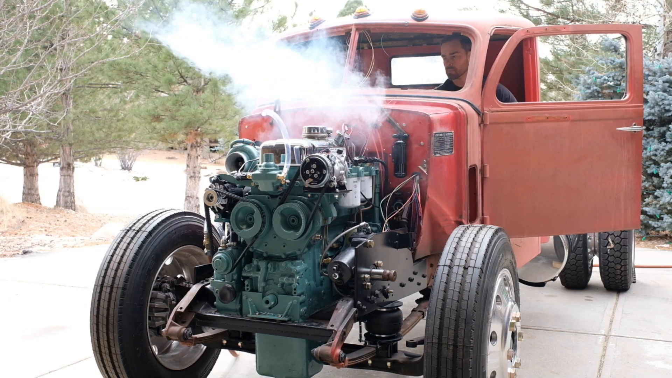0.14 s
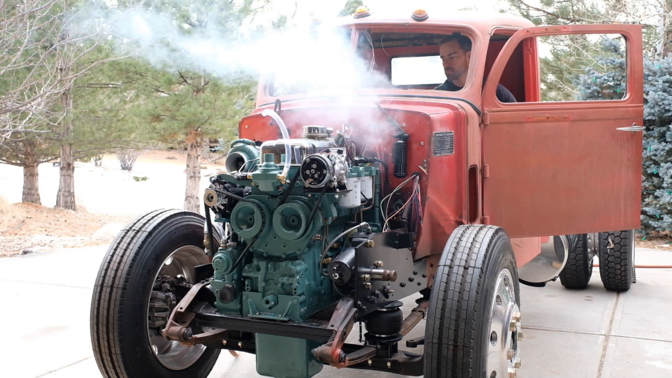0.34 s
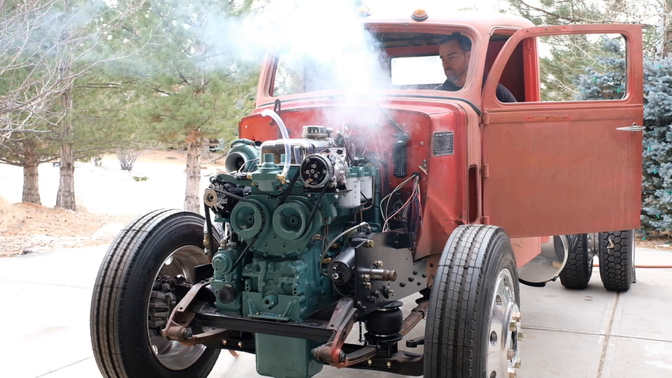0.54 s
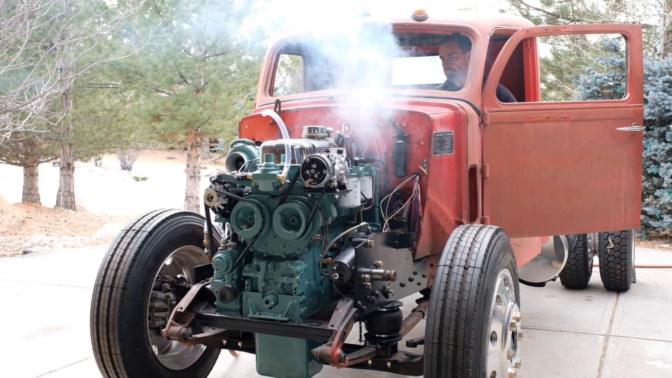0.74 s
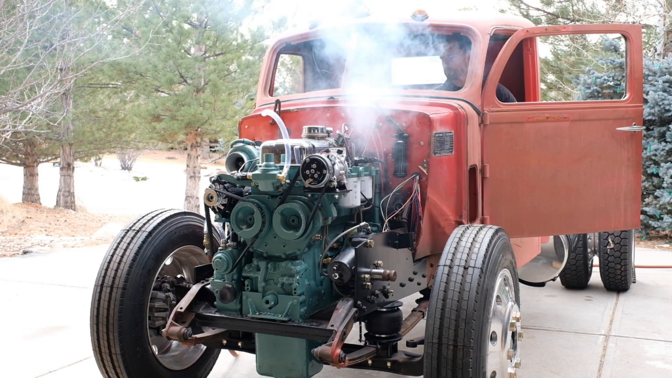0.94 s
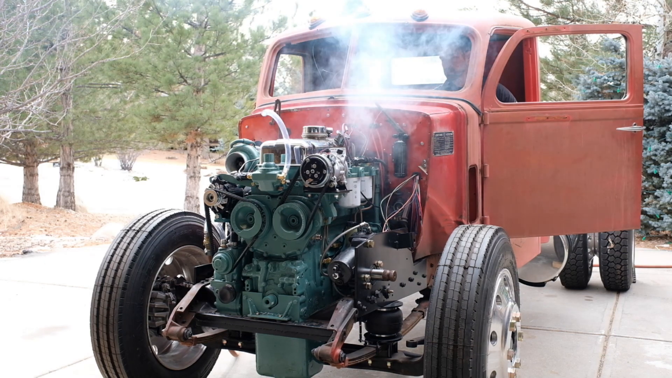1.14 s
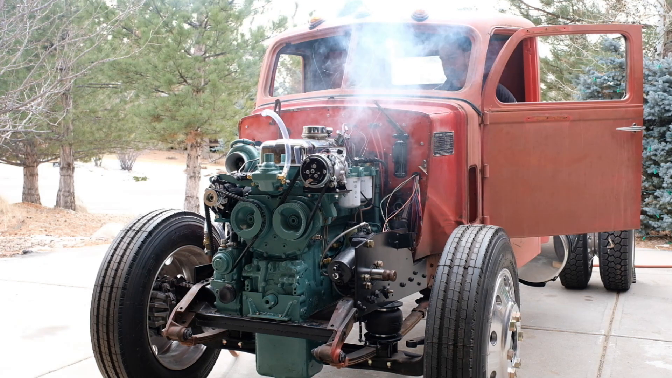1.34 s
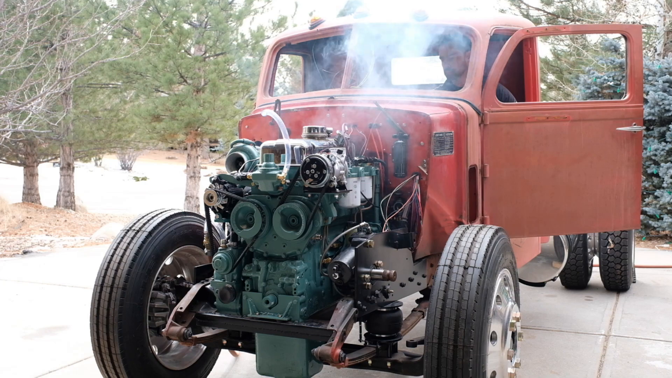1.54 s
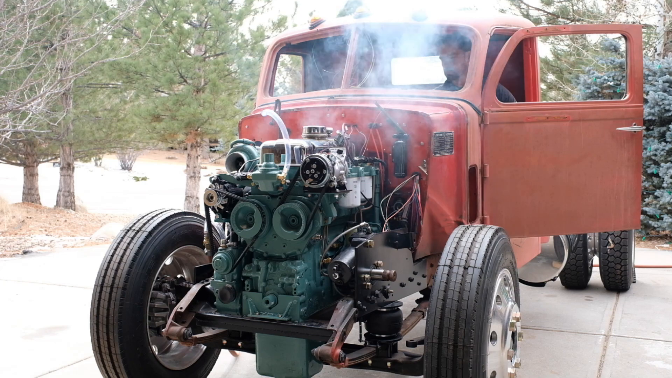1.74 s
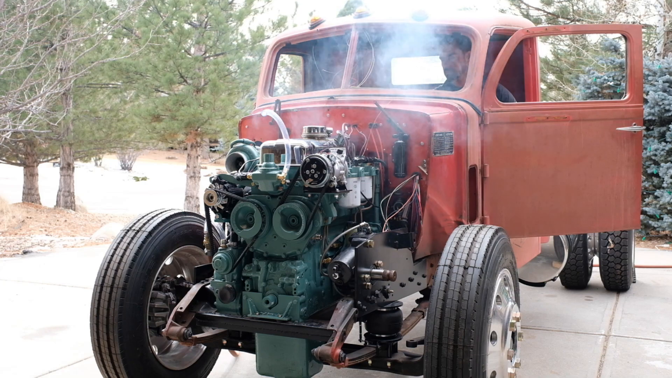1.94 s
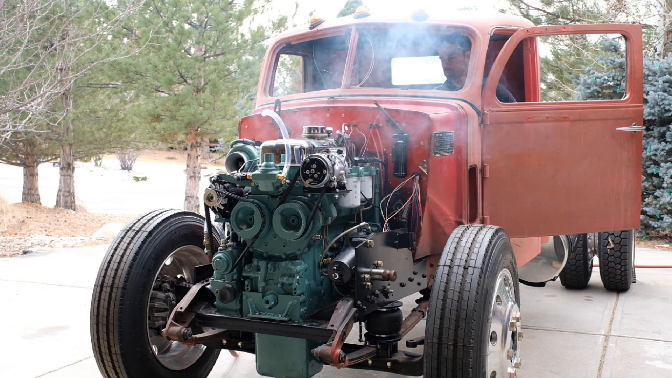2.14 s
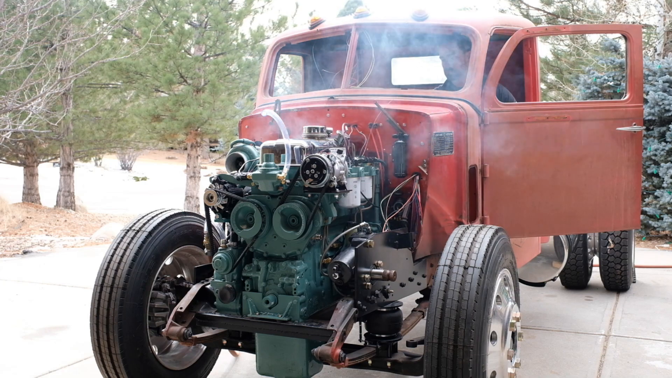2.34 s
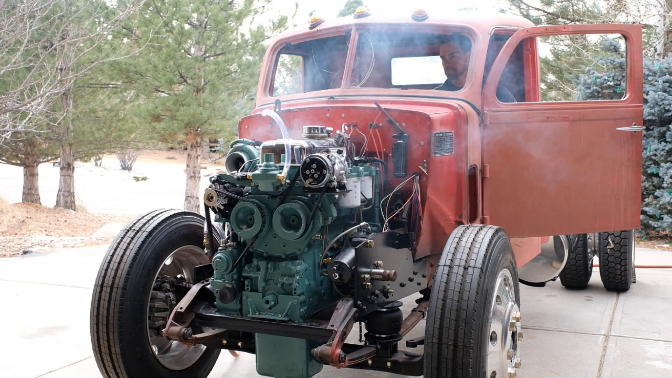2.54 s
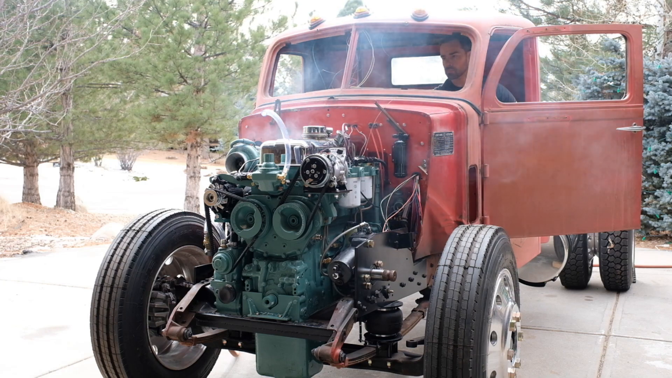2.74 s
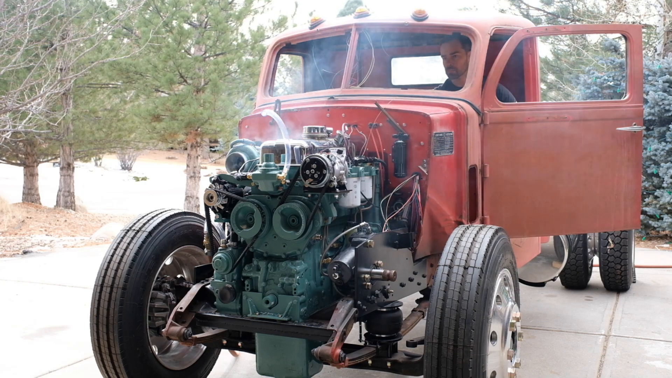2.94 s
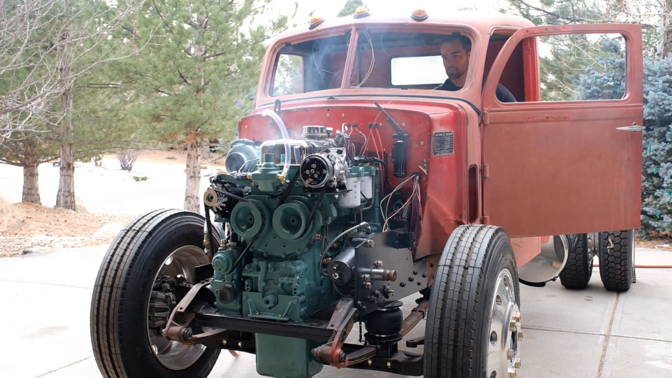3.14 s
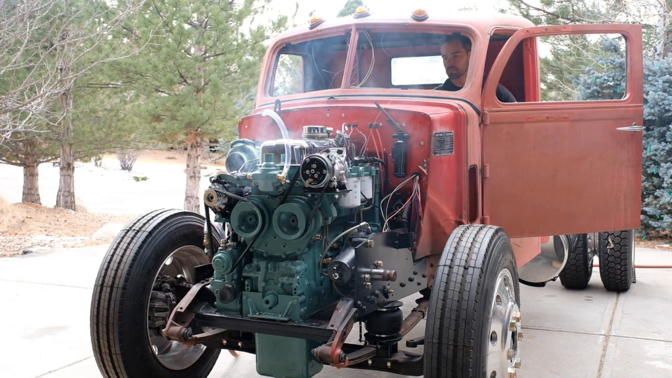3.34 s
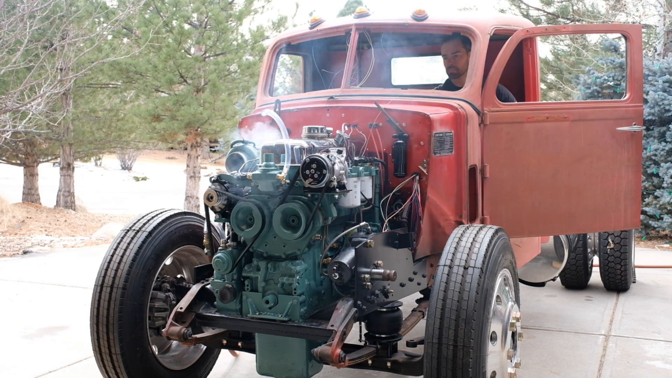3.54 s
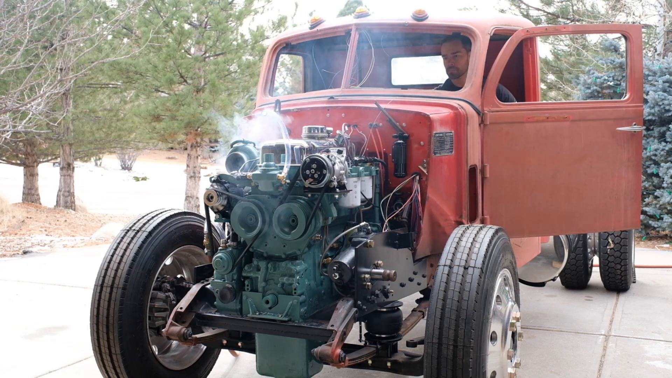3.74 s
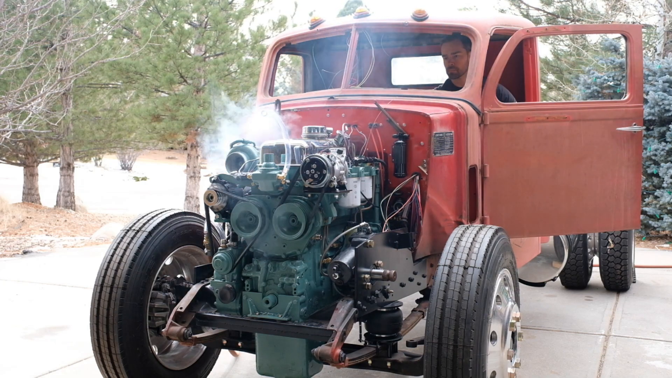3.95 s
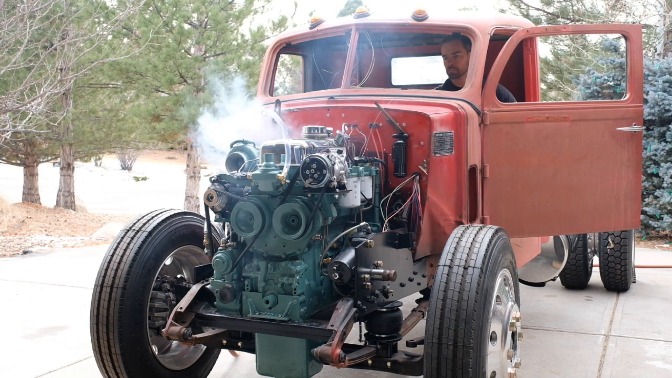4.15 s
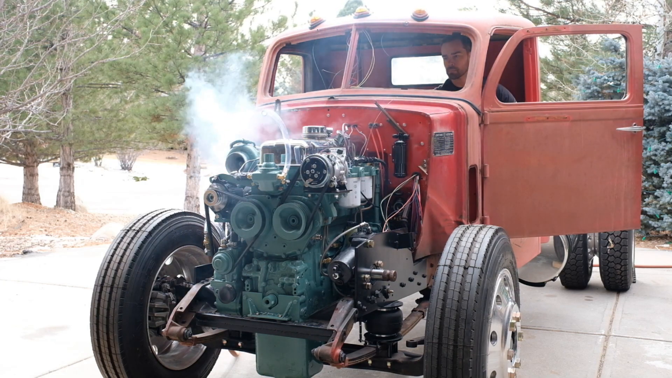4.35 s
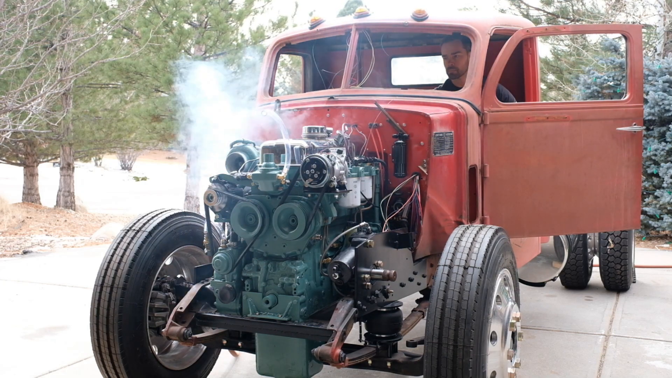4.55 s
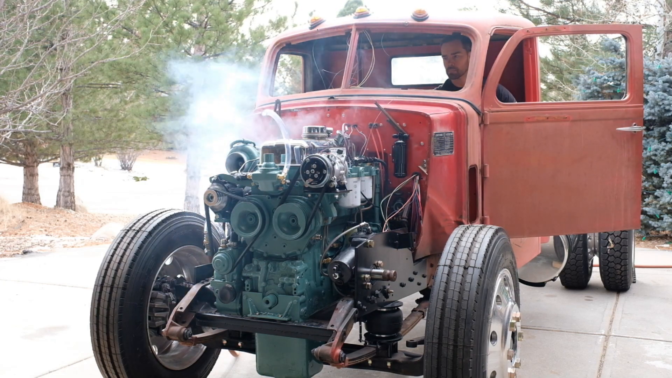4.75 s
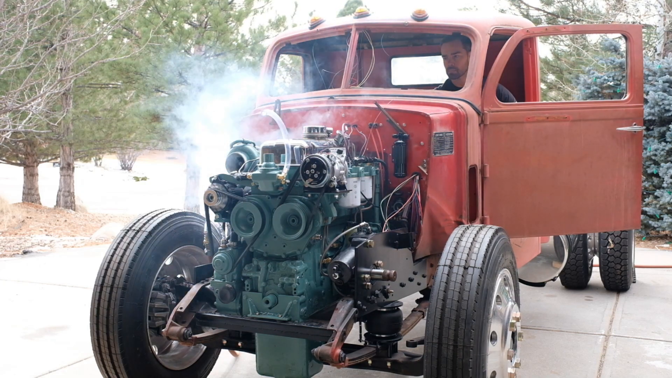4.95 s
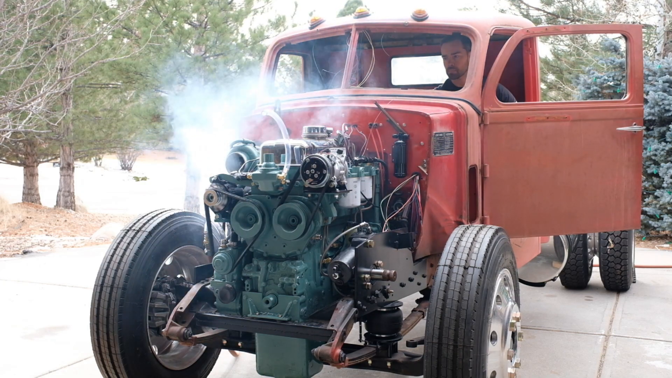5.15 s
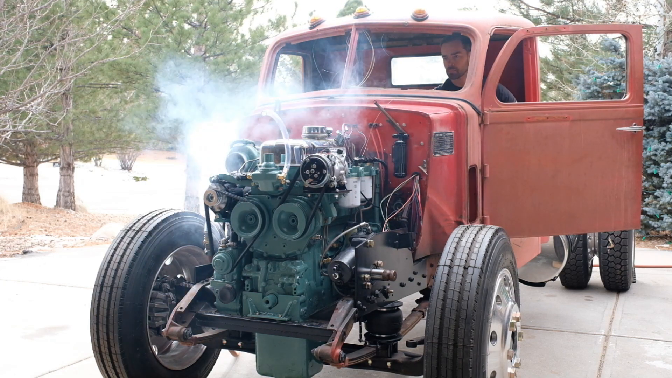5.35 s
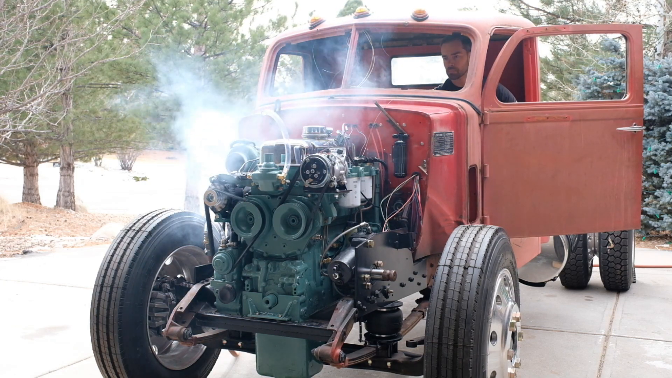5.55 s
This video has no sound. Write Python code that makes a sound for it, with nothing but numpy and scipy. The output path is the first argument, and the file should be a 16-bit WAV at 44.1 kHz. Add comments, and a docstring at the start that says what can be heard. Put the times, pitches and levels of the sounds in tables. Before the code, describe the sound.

A close stereo outdoor microphone hears a rough engine rush die away, its treble going first. Soft wind flutter and small buffets wander between left and right. Then a sharp double clunk brings in a big diesel's starter: a harsh metallic whine rises quickly and throbs about fourteen times a second. Isolated combustion thuds with small cracks briefly ease the whine and raise its pitch before it sags.

```python
"""A driveway: a big diesel in an open truck frame is cranked. The last attempt dies away as filtered noise,
wind bumps the microphone as low noise puffs, then the starter slams in and spins up.
Its gears whine (overtones of the tooth rate) and grind (noise pulsed by the teeth) against each compression.
One cylinder fires four times with a dull thud; each firing unloads the starter and kicks the speed up,
after which it sags again."""
import sys
import numpy as np
from scipy import signal
from scipy.fft import rfft, irfft, next_fast_len
from scipy.io import wavfile

SR = 44100
rng = np.random.default_rng(int(sys.argv[2]) if len(sys.argv) > 2 else 0)


def log_audio(samples):
    """Write samples as a 16-bit WAV file to the path given in sys.argv[1]."""
    # one column per channel
    frames = np.atleast_2d(samples).T
    # limit to full scale, then quantise
    limited = np.clip(frames, -1, 1)
    pcm = np.round(limited * 32767).astype(np.int16)
    wavfile.write(sys.argv[1], SR, pcm)


N = 246519
TIME = np.arange(N) / SR

# a cylinder fires: start_s, speed_kick_teeth_per_s, thud_db, crack_db
FIRINGS = [(3.858, 114, -17, -16.5), (4.116, 58, -17.5, -22.5), (4.349, 12, -23.5, -39),
           (4.637, 76, -15.5, -23)]
# compression strokes: start_s, tooth_load_db (relative)
STROKES = [(3.162, -12), (3.305, -13), (3.382, -7.5), (3.482, -4.5), (3.577, -3.5), (3.663, -1),
           (3.745, -4), (3.835, -13), (3.908, 2.5), (3.968, 2.5), (4.032, -0.5), (4.099, -4.5), (4.159, 0),
           (4.222, -0.5), (4.282, 1), (4.34, 0.5), (4.411, -1.5), (4.479, -5), (4.546, -3.5), (4.613, -31),
           (4.693, -2), (4.754, -4.5), (4.814, -1), (4.88, -1), (4.95, -2.5), (5.013, -1.5), (5.094, 0),
           (5.172, -2), (5.244, -6.5), (5.319, -2), (5.398, -4), (5.48, -.5), (5.554, -2)]

START_S = 3.11  # the starter begins to turn
FIRST_SPEED_HZ, CRANKING_SPEED_HZ = 139.97, 406.9  # gear teeth meeting per s


def from_db(db):
    """Decibels to gain."""
    return 10 ** (np.asarray(db) / 20)


def rms_one(x):
    """Scale to unit power."""
    return x / np.sqrt(np.mean(x ** 2) + 1e-20)


def at_hz(points, hz):
    """Read a table on a log-frequency axis."""
    table_hz, values = np.array(points)[:, 0], np.array(points)[:, 1]
    return np.interp(np.log(hz + 1), np.log(table_hz), values)


def drift(rate_hz):
    """Random line of rms 1 through rate_hz new values a second."""
    return rms_one(np.interp(TIME * rate_hz, np.arange(30000), rng.standard_normal(30000)))


def dull(x, cutoff_hz, order=2):
    """Low-pass."""
    sos = signal.butter(order, min(cutoff_hz, .45 * SR), fs=SR, output="sos")
    return signal.sosfilt(sos, x)


def noise(spectrum, drive=1):
    """Stereo noise, shaken by drive, then coloured; left-right correlation varies with pitch; rms 1."""
    # pitch_hz, left_right_correlation
    likeness = [(40, 0.41), (130, 0.85), (300, 0.95), (900, 0.79), (1600, 0.79), (2800, 0.4), (5000, 0.34),
                (10000, 0.44)]
    size = next_fast_len(N + 4096)
    hz = np.fft.rfftfreq(size, 1 / SR)
    mid, side = rfft(rng.standard_normal((2, N)) * drive, size) * from_db(at_hz(spectrum, hz))
    alike = np.clip(at_hz(likeness, hz), 0, 1)
    stereo = np.sqrt(1 + alike) * mid + np.sqrt(1 - alike) * side * [[1], [-1]]
    return rms_one(irfft(stereo, size)[:, :N])


def swell(centre_s, length_s):
    """Bell-shaped envelope; length_s spans two standard deviations."""
    return np.exp(-np.minimum((2 * (TIME - centre_s) / length_s) ** 2 / 2, 30))


def blow(age_s, rise_s, t60_s):
    """Envelope of a blow at a given age: a quick rise, then an exponential decay."""
    age_s = np.maximum(age_s, 0)
    return (1 - np.exp(-age_s / rise_s)) * from_db(-60 * np.minimum(age_s / t60_s, 4))


def overtone(teeth, multiple, rough_db=3.0, jitter_teeth=0.018):
    """One partial of the mesh; uneven teeth shake its strength, and its phase the more the higher it lies."""
    phase = 2 * np.pi * multiple * (teeth + jitter_teeth * drift(260))
    return from_db(rough_db * drift(260)) * np.sin(phase)


def housing(x):
    """The bell housing rings in its modes: two-pole resonators of alternating sign; rms 1."""
    # pitch_hz, width_hz, level_db (relative)
    modes = [(581, 186, -5), (806, 35, -4), (946, 12, -21.5), (1076, 65, -3.5), (1252.6, 38.3, 4),
             (1407, 20.7, 1), (1794, 34.5, -0.5), (1996, 10, -5.5), (2522, 19, -8.5), (3380, 39, -8),
             (4890, 29, -11), (5570, 40, -15)]
    out = 0
    for k, (hz, width_hz, db) in enumerate(modes):
        r = np.exp(-np.pi * width_hz / SR)
        poles = [1, -2 * r * np.cos(2 * np.pi * hz / SR), r * r]
        out = out + (-1) ** k * from_db(db) * (1 - r * r) * signal.lfilter([1, 0, -1], poles, x)
    return rms_one(out)


def reflections(x, wet_db, longest_s, count=14):
    """Concrete, cab and door return a spray of early echoes, different at each ear."""
    out = x * np.ones((2, 1))
    for side, direct in zip(out, out.copy()):
        shares = (np.arange(count) + rng.random(count)) / count
        for share, sign in zip(shares, rng.choice([-1, 1], count)):
            lag = int(SR * (0.000974 + longest_s * share ** 2))
            side[lag:] += sign * from_db(wet_db - 10.6 * share) * direct[:N - lag]
    return out


def crank_speed():
    """Teeth per second: an exponential spin-up, plus a kick from each firing that friction eats away."""
    spin_up_s, kick_rise_s, kick_t60_s = .19, .02, 3.16
    approach = np.exp(-np.maximum(TIME - START_S, 0) / spin_up_s)
    spin_up = CRANKING_SPEED_HZ + (FIRST_SPEED_HZ - CRANKING_SPEED_HZ) * approach
    return spin_up + sum(kick * blow(TIME - s, kick_rise_s, kick_t60_s) for s, kick, _, _ in FIRINGS)


def crank(speed, ripple=.04, lead_strokes=.03, slack=0.9, bite=1.6, runout=0.1):
    """Tooth count and load (mean 1): each compression loads the teeth, rebounds once and ripples the speed."""
    rebound_s, rebound_db, pinion_teeth = 0.027, -10, 9
    times, db = np.transpose(STROKES)
    stroke_times = [START_S, *times, 2 * times[-1] - times[-2]]
    stroke = np.interp(TIME, stroke_times, np.arange(len(times) + 2))
    judder = .008 * drift(200)
    teeth = np.cumsum(speed * (1 + ripple * np.cos(2 * np.pi * (stroke + lead_strokes)) + judder)) / SR

    latest = np.maximum(np.searchsorted(times, TIME) - 1, 0)
    age_s = TIME - times[latest]
    rebound = from_db(rebound_db) * blow(age_s - rebound_s, rise_s=.004, t60_s=.06)
    blows = from_db(db[latest]) * (blow(age_s, rise_s=.002, t60_s=.1) + rebound)
    # the load eases just before each stroke
    floating = 1 - .25 * (stroke % 1) ** 6
    # the pinion runs slightly off centre and presses harder once a turn
    off_centre = 1 + runout * np.sin(2 * np.pi * teeth / pinion_teeth)
    load = (slack + bite * blows) * np.abs(floating * off_centre)
    return teeth, load / np.mean(load[TIME > START_S])


def starter(speed):
    """Pinion teeth strike the ring gear: a whine on the tooth rate, a ringing housing and a coarse grinding."""
    # gear whine: tooth_rate_multiple, level_db, growth_power (of tooth load)
    gear_orders = [(1, -5.5, 0.27), (2, -1, 0.43), (3, -3, 1.43), (4, -41, 0.83), (5, -47, 0.71),
                   (8, -21, 0.33), (9, -23.5, 0.94), (11, -34.5, 0.33), (12, -25.5, 0.35), (13, -34, 0.27)]
    # high overtone against the pitch it passes: pitch_hz, level_db
    ring_response = [(1250, -3), (1600, -6), (1830, 7), (1980, -2), (2350, -1), (2520, 1), (2630, -14),
                     (3100, -18)]
    # noise spectra: pitch_hz, level_db (relative, per Hz)
    grind_spectrum, rumble_spectrum = [(150, -29), (260, -5.5), (360, -6.5), (520, -5.5), (700, -5.5),
                                       (1000, 3), (1400, -3), (1650, -3), (2200, -4.5), (2900, -8.5),
                                       (3700, -17.5), (5500, -34.5), (10000, -21.5), (15000, -66)], [(25, -10), (60, 5), (90, 7), (120, 6), (146, 5),
                                                      (178, -2), (255, 4), (340, -3), (520, -44.5)]
    hiss_spectrum, surge_spectrum = [(2500, -10), (4000, -2), (5200, -3), (6500, -7), (8000, -9),
                                     (9700, -13), (11500, -24), (14000, -39), (16000, -50)], [(60, -5), (150, -9), (250, 6.5), (400, -5.5),
                                                   (800, -2.5), (1400, -7), (3000, -58)]
    ring_order, whine_low_cut_hz, relief_s = 6, 554, 0.053

    teeth, load = crank(speed)
    doublings = np.log2(speed / CRANKING_SPEED_HZ)
    relief = sum(swell(s + 0.024, relief_s) for s, *_ in FIRINGS)
    running = np.clip((TIME - START_S) / 0.023, 0, 1)

    def gain(db, db_per_doubling, relief_db):
        """Level at cranking speed, its change per doubling of speed and at each firing."""
        return from_db(db + db_per_doubling * doublings + relief_db * relief)

    # teeth hit with unequal force; each hit decays toward the next
    force = from_db(1.5 * np.clip(rng.standard_normal(N), -2, 2))[teeth.astype(int)]
    hits = force * (.5 + np.exp(-3 * (teeth % 1)))
    coarse = dull(noise(grind_spectrum, hits), 7000, order=4)
    grind = gain(-22.5, -3.5, relief_db=0) * load ** .42 * coarse

    strikes = noise([(100, 0), (10000, 0.018)], hits * load ** 1.38)
    body = dull(gain(-25, -3, relief_db=0.5) * housing(strikes), 4600)

    partials = sum(from_db(db) * load ** growth * overtone(teeth, k) for k, db, growth in gear_orders)
    whine = gain(-21.5, -1.7, relief_db=-7) * partials
    # the gears radiate little low down
    low_cut = signal.butter(4, whine_low_cut_hz, "high", fs=SR, output="sos")
    whine = signal.sosfilt(low_cut, whine)

    # one high overtone rings under load, most where it crosses a mode of the housing
    strain = load ** 3 / (1 + .3 * load ** 3)
    ring_hz = ring_order * np.gradient(teeth) * SR
    response = from_db(at_hz(ring_response, ring_hz))
    ring = gain(-17.5, 0, relief_db=-9) * response * strain * overtone(teeth, ring_order)
    tones = whine + reflections(ring, wet_db=-11.0, longest_s=.012)

    rumble = gain(-36, 1, relief_db=6.8) * noise(rumble_spectrum)
    # a brief low surge swells as the starter takes hold
    surge = from_db(-25.5) * swell(3.23, length_s=0.13) * noise(surge_spectrum)
    hiss = gain(-41.5, 1, relief_db=0.56) * load ** .75 * noise(hiss_spectrum, force)
    hiss = reflections(hiss, wet_db=-6, longest_s=.016)
    return running * (grind + body + tones + rumble + surge + hiss)


def motor_chirps(speed, centre_hz=3450, glide_hz_per_s=4500, peak_db=-27,
                 best_speed_hz=445, off_speed_db_per_hz=0.25):
    """Freed after a stroke, the motor speeds up and sweeps through a case resonance, earlier at high speed."""
    # chirp position between two strokes: speed_teeth_per_s, interval_share
    chirp_place = [(440, .82), (450, .72), (460, .45), (500, .3)]
    length_s = .021
    out, times = np.zeros(N), [s for s, _ in STROKES]
    for start, end in zip(times, times[1:]):
        rate_hz = np.interp(start, TIME, speed)
        centre_s = start + np.interp(rate_hz, *np.transpose(chirp_place)) * (end - start)
        near = np.abs(TIME - centre_s) < .06
        age_s = TIME[near] - centre_s
        tone = np.sin(2 * np.pi * (centre_hz * age_s + glide_hz_per_s * age_s ** 2 / 2))
        level = from_db(peak_db - off_speed_db_per_hz * abs(rate_hz - best_speed_hz))
        out[near] += level * np.exp(-2 * (age_s / length_s) ** 2) * tone
    return reflections(out, wet_db=-13, longest_s=.006)


def engagement():
    """The solenoid snaps shut, then the pinion hits the ring gear: decaying bursts of metallic noise."""
    # start_s, level_db, ring_t60_s, low_pass_hz
    clacks = [(3.078, -28, 0.091, 2500), (3.086, -3.5, 0.06, 10500), (3.108, -0.5, 0.06, 1730)]
    # pitch_hz, level_db (relative, per Hz)
    clack_spectrum = [(100, -22), (350, -16), (800, 2.5), (1700, 4.5), (2600, -3), (3600, -2.5), (5500, -9),
                      (10000, -15), (15000, -35)]
    metal = noise(clack_spectrum)
    out = 0
    for s, db, t60_s, cutoff_hz in clacks:
        burst = metal * blow(TIME - s, rise_s=0.005, t60_s=t60_s)
        out = out + from_db(db) * dull(burst, cutoff_hz, order=1)
    return out


def firings():
    """A lone combustion: a crack from the block and a thud from the exhaust, both noise bursts."""
    # pitch_hz, level_db (relative, per Hz)
    thud_spectrum = [(25, -20), (70, -3), (140, 0), (230, -5), (400, -20), (1200, -45)]
    crack_spectrum = [(1500, -3), (4000, 0), (9000, -10), (15000, -30)]
    thud = sum(from_db(db) * blow(TIME - s + 0.012, rise_s=0.0074, t60_s=0.3) for s, _, db, _ in FIRINGS)
    crack = sum(from_db(db) * blow(TIME - s + .002, rise_s=.002, t60_s=.04) for s, _, _, db in FIRINGS)
    return thud * dull(noise(thud_spectrum), 5000) + crack * noise(crack_spectrum)


def run_down():
    """The engine's rush, the housing ringing in it, fades slowly, then fast past the stall, treble first."""
    # pitch_hz, level_db (relative, per Hz)
    rush_spectrum = [(100, -7), (300, -7.5), (500, -10.5), (800, -4.5), (1250, 0), (1700, -5), (2300, -10),
                     (3000, -16.5), (4000, -18), (5500, -24.5), (7000, -31), (10000, -39.5), (14000, -57)]
    ringing_spectrum = [(900, -12), (1800, -3), (2500, -6), (3400, 0), (5500, 3), (8000, -12)]
    level_db, fade_db_per_s = -32, 21
    stall_s, stall_fade_db_per_s, treble_fade_db_per_s = 0.37, 43, 48
    stalled_s = np.maximum(TIME - stall_s, 0)
    rasp = from_db(2 * drift(400))
    ringing = .25 * housing(noise(ringing_spectrum, rasp))
    rush = noise(rush_spectrum, rasp) + ringing
    low = dull(rush, 2300, order=1)
    treble = from_db(-treble_fade_db_per_s * stalled_s) * (rush - low)
    fade = from_db(level_db - fade_db_per_s * TIME - stall_fade_db_per_s * stalled_s)
    return fade * (low + treble)


def wind():
    """Eddies at the microphone: a lumpy low flutter with single buffets, over the quiet outdoor air."""
    # strongest buffets: start_s (centre), level_db, length_s, left_right_db
    buffets = [(0.294, -37, 0.045, -25.5), (0.613, -42.5, .013, -18), (0.724, -37, 0.0089, 13),
               (.844, -40, 0.021, -25), (1.006, -38.5, 0.018, 29), (1.121, -41.5, 0.012, 28),
               (1.159, -39.5, 0.012, 23), (1.431, -27.5, 0.013, 6.5), (1.515, -33, 0.024, -20.5),
               (1.612, -40.5, 0.069, -7), (1.674, -29.5, 0.015, 14), (2.04, -42.5, 0.014, -20),
               (3.006, -48, 0.011, -9)]
    # noise spectra: pitch_hz, level_db (relative, per Hz)
    gust_spectrum, air_spectrum = [(20, -21), (40, 1.5), (70, 1.5), (110, -4), (170, -16), (280, -27),
                                   (600, -68)], [(25, -11), (50, 2.5), (100, -3), (250, -3.5), (500, -4.5),
                                                 (800, -8), (1300, -17.5), (2000, -24), (3000, -28.5),
                                                 (5000, -32.5), (9000, -39), (14000, -43.5)]
    eddy_spectrum = [(20, -17), (50, -12), (90, 1.0), (250, -9.0), (600, -26), (2000, -49)]
    gust_db, gust_lumps_db, gust_pan_db, air_db = -44.5, 2, -5, -53
    gust_end_s, gust_drop_s, buffet_edge_hz = 2.18, 0.014, 188

    sides = np.array([[.5], [-.5]])
    blowing = np.clip((gust_end_s - TIME) / gust_drop_s + 1, 0, 1)
    gust_level = from_db(gust_db + gust_lumps_db * drift(35.07) + gust_pan_db * sides)
    flutter = blowing * gust_level * noise(gust_spectrum)
    out = flutter + from_db(air_db) * noise(air_spectrum)
    eddies = noise(eddy_spectrum)
    for s, db, length_s, pan_db in buffets:
        near = np.abs(TIME - s) < .15
        shape = swell(s, length_s)[near]
        puff = dull(eddies[:, near] * shape, buffet_edge_hz)
        out[:, near] += from_db(db + pan_db * sides) * rms_one(puff) * np.sqrt(np.mean(shape ** 2))
    return out


def scene():
    """The truck stands slightly to the right."""
    speed = crank_speed()
    truck = starter(speed) + motor_chirps(speed) + engagement() + firings() + run_down()
    return truck * from_db([[-.5], [.5]]) + wind()


def record(dry):
    """Peaks are rounded, the top is cut."""
    rounded = 1.2 * np.tanh(dry / 1.2)
    top_cut = signal.ellip(10, .1, 80, 15750, fs=SR, output="sos")
    return signal.sosfilt(top_cut, rounded)


dry = scene()
out = record(dry)
log_audio(out)
```